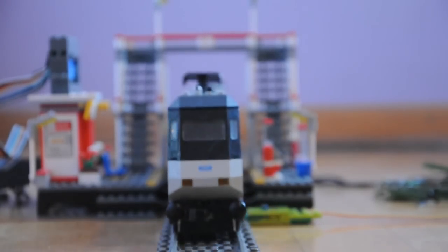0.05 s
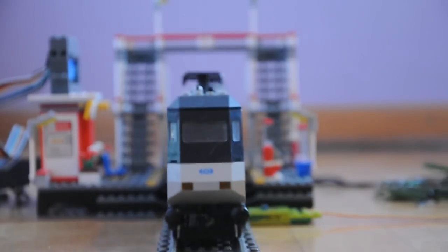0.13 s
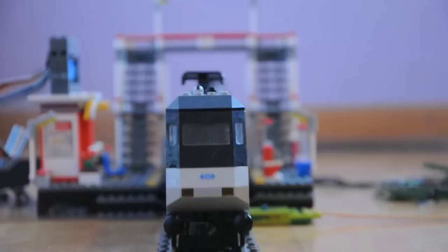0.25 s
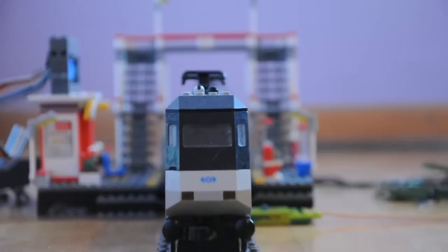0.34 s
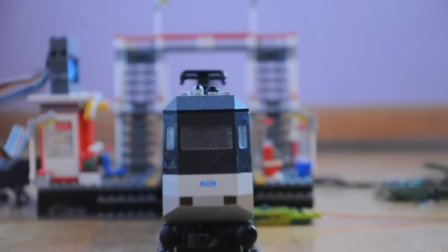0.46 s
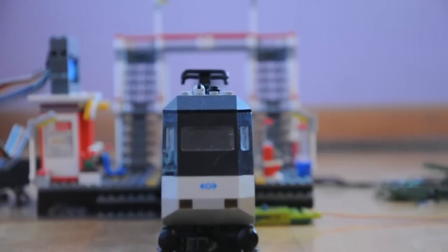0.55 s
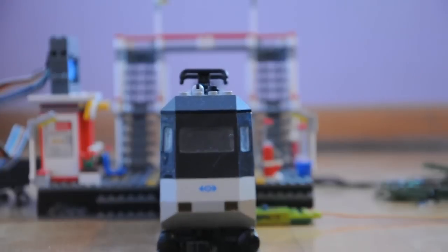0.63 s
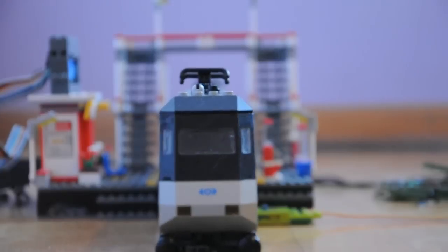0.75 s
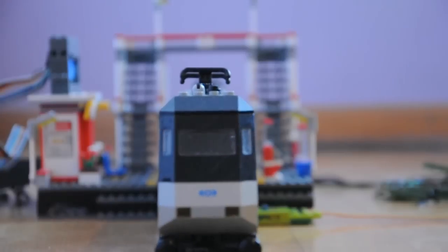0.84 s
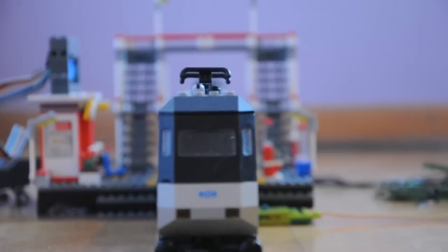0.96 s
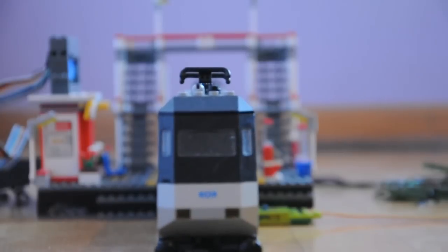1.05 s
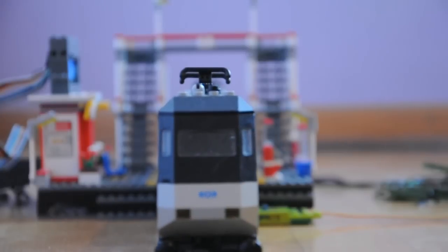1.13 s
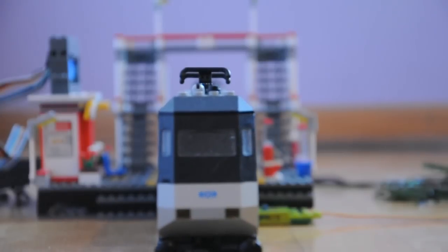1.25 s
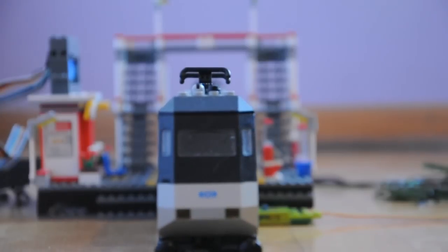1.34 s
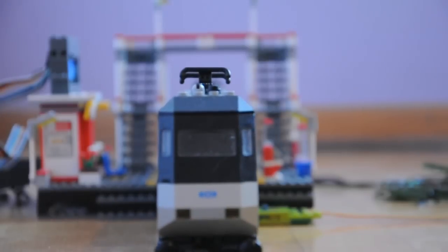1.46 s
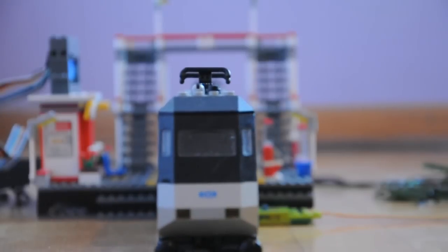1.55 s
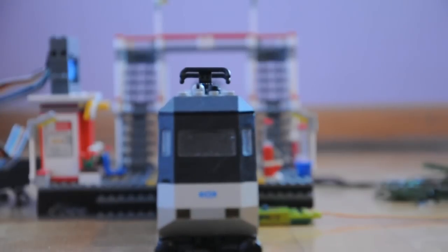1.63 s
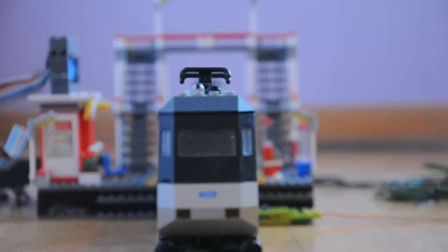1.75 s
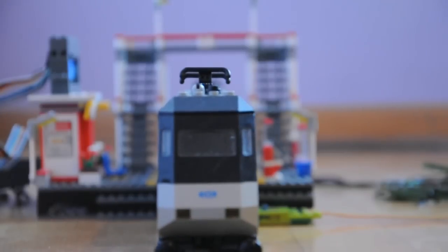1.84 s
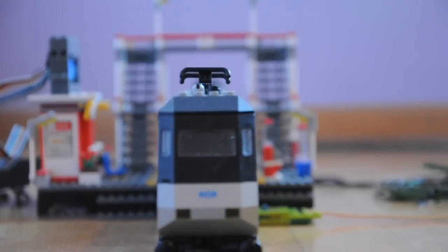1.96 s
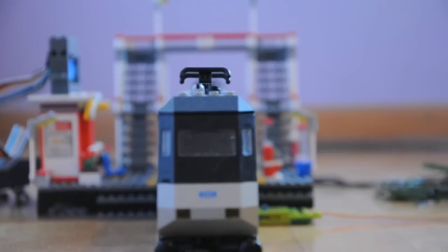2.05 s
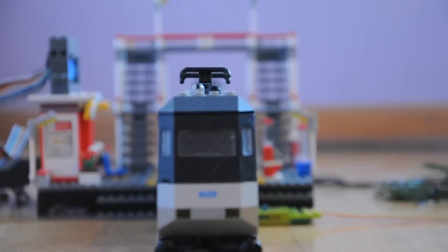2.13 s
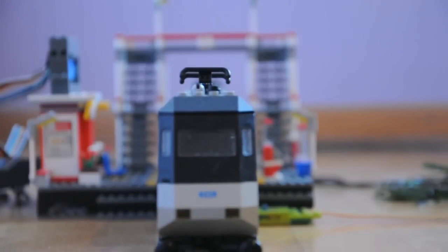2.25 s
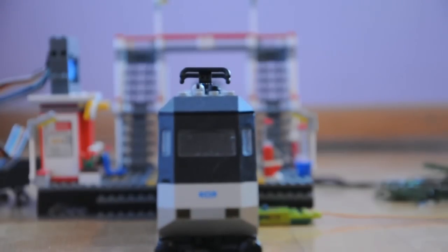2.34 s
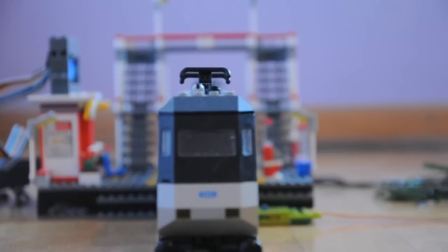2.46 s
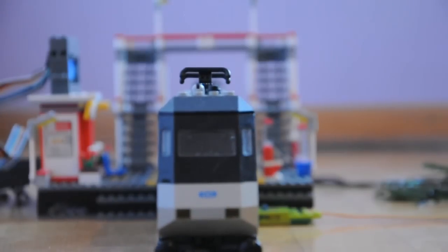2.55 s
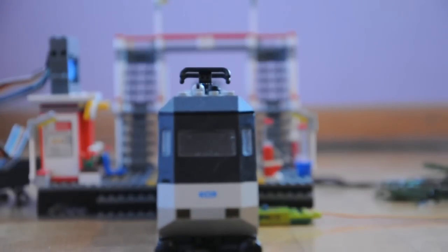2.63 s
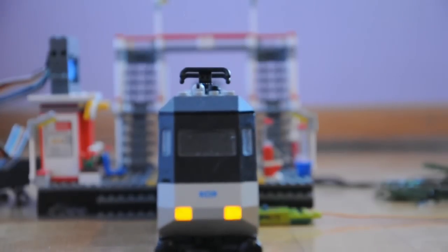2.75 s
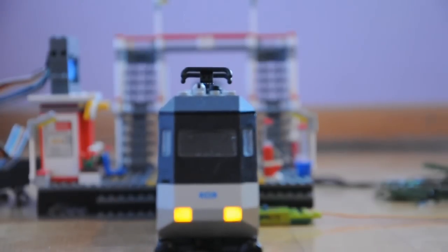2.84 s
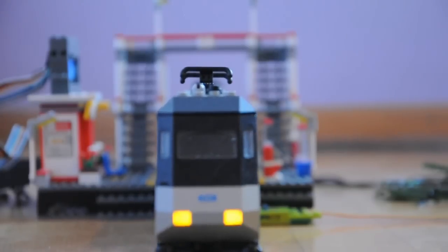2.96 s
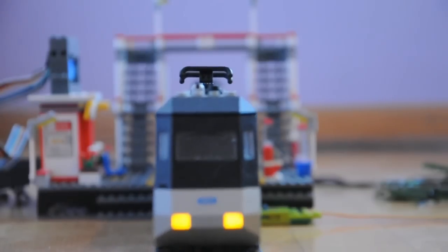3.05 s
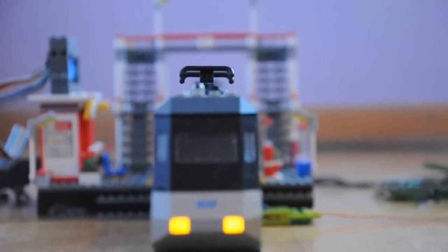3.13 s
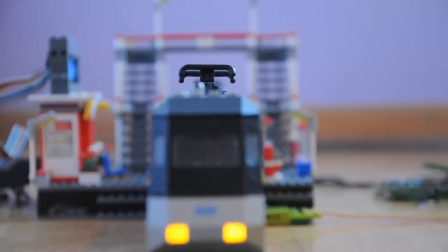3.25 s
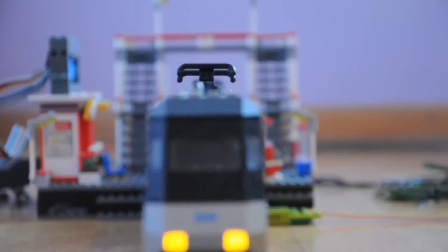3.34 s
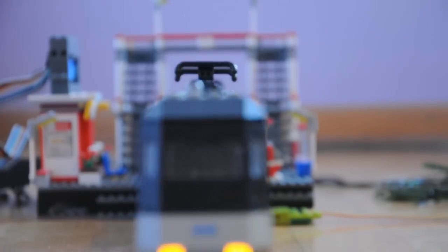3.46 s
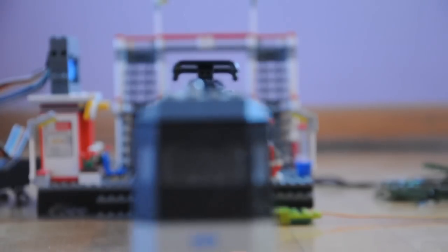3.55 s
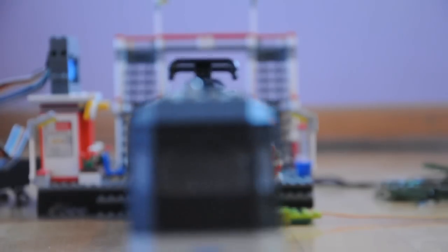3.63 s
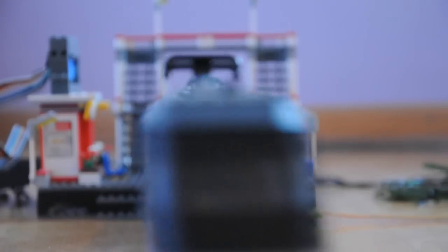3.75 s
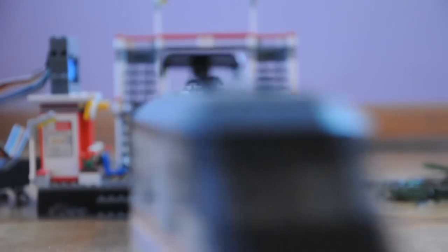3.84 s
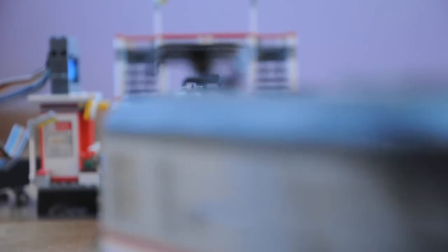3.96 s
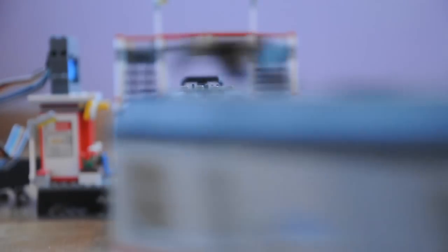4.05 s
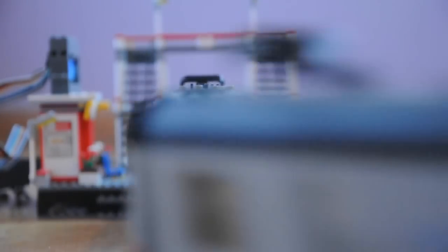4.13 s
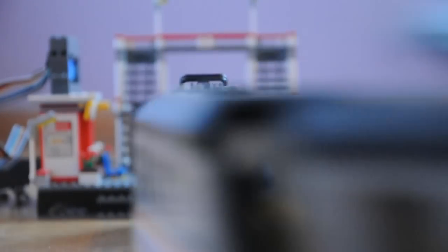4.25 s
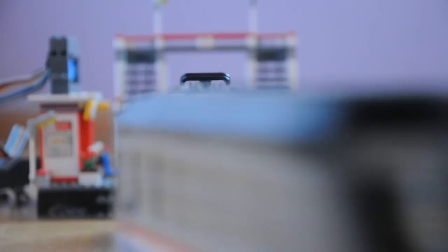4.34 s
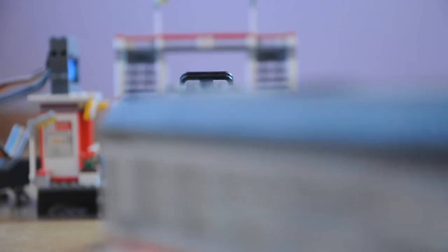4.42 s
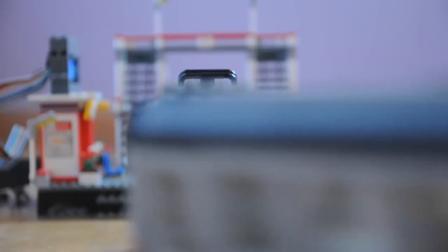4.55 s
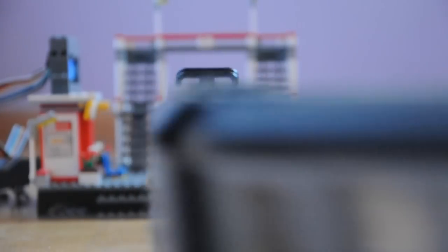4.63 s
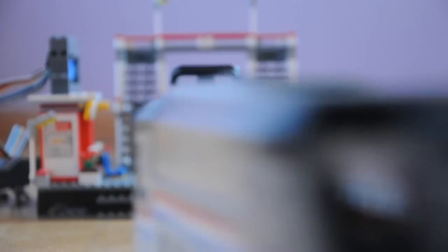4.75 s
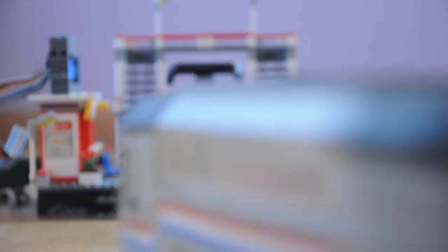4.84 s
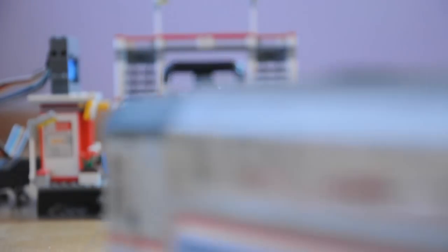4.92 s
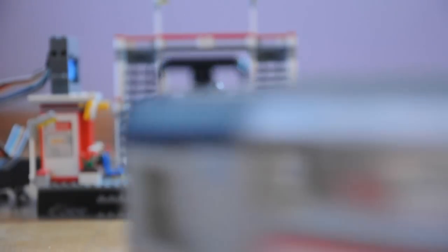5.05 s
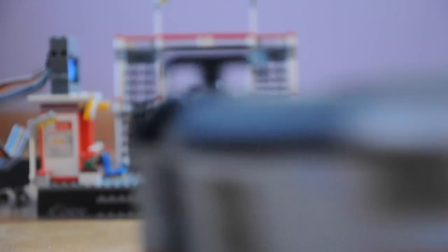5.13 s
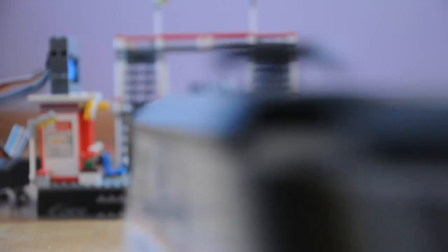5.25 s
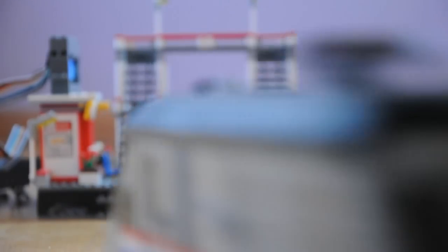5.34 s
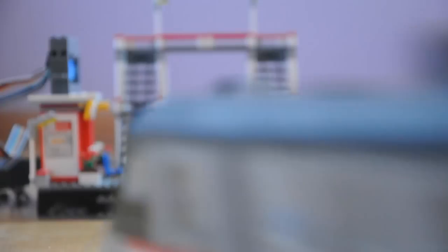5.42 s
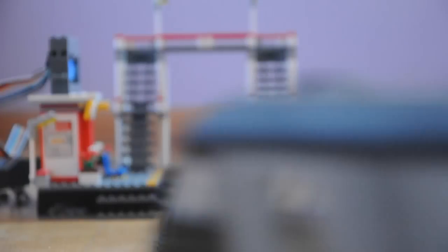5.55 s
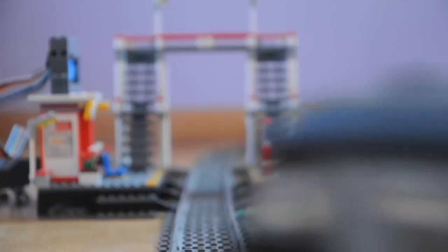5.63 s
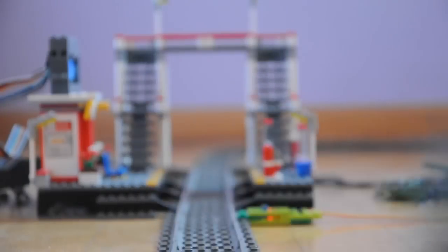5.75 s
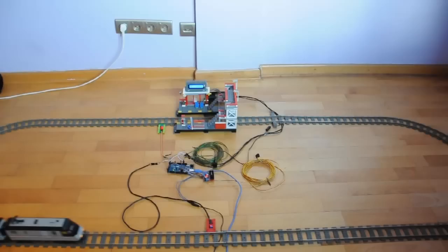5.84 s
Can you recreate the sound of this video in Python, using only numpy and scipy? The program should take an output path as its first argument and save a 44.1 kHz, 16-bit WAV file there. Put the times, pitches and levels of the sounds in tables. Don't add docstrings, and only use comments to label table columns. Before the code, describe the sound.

A toy electric train rattles to a stop, waits in a quiet humming room, then jerks into motion and whirs loudly past on plastic track.

```python
import sys
import numpy as np
from scipy import signal
from scipy.fft import rfft, irfft
from scipy.io import wavfile
from scipy.ndimage import uniform_filter1d

SR = 44100
rng = np.random.default_rng(int(sys.argv[2]) if len(sys.argv) > 2 else 0)


def linear_from_db(decibels):
    return 10 ** (np.asarray(decibels, float) / 20)


def digitize_waveform(pressure):
    field = np.atleast_2d(pressure).T
    bounded = np.clip(field, -1, 1)
    quanta = np.round(bounded * 32767).astype(np.int16)
    wavfile.write(sys.argv[1], SR, quanta)


N = 259749
TIME = np.arange(N) / SR
START_S = 1.5
MOTOR_PASSES_S = 3.84

# frequency in Hz, density in dB per Hz.
ROOM_SPECTRUM = [(15, -50), (25, -20), (69, -12.5), (101, -12), (174, -9), (256, -10), (328, -11),
                 (550, -17), (630, -17), (674, -17), (1060, -21), (2730, -24.5), (5500, -27), (7150, -88),
                 (12100, -120)]
# frequency in Hz, resting level in dB.
HUM_HZ = [73.4, 102.3, 155.3]
HUM_REST_DB = [-80.5, -71, -74.5]
# centre in seconds, half length in seconds, level in dB.
HUM_SWELLS = [
    [(.38, .08, -69), (2.8, 0.14, -70.5), (3.27, .2, -59), (4.13, 0.17, -60), (4.5, 0.19, -56.5),
     (5.0, 0.13, -69), (5.6, 0.1, -67)],
    [(.46, 0.061, -59), (1.68, 0.033, -62), (4.6, 0.26, -74), (5.45, 0.1, -70), (5.67, 0.039, -63),
     (5.89, 0.077, -62)],
    [(.13, .1, -76), (.46, .07, -58), (1.8, 0.14, -79), (5.8, 0.18, -52.5)],
]
# time in seconds, tooth mesh in Hz.
SPEED = [(0, 290), (.26, 248), (.32, 200), (.7, 40), (2.55, 40), (2.74, 138), (2.96, 222), (3.17, 306),
         (3.42, 388), (3.62, 438), (3.9, 474), (4.1, 498), (4.37, 504), (4.73, 480), (4.95, 474),
         (5.17, 452), (5.33, 412), (5.89, 404)]
# time in seconds, level in dB.
RATTLE = [(0, -37), (.1, -39.5), (.28, -44), (.535, -50.5), (.6, -59), (.73, -64.5), (.8, -73), (1.0, -99),
          (2.503, -95.5), (2.52, -48), (2.7, -47.5), (2.92, -44.5), (3.2, -37), (3.5, -28.5), (4.0, -27.5),
          (4.4, -29.5), (4.9, -30.5), (5.89, -34.5)]
# frequency in Hz, density in dB per Hz.
COASTING_SPECTRUM = [(71, -37), (120, -4), (219, -7), (260, -4), (399, -3.5), (521, -1), (780, -2),
                     (1900, -6), (2470, -8), (4180, -120)]
# frequency in Hz, density in dB per Hz.
TRACK_SPECTRUM = [(88, -37.5), (150, -13.5), (184, -11), (412, -4), (572, -3), (1080, 3), (1550, -2),
                  (1900, 0.5), (2470, -24), (4180, -120)]
SHELL_SPECTRUM = [(820, -30), (1400, -10.5), (1720, -13), (2240, -2.5), (2870, -8.5), (3110, -13.5),
                  (3600, -10), (4680, -8.5), (7920, -120)]
GEARS_SPECTRUM = [(1880, -18), (3200, -1.5), (3630, -11.5), (4350, 2.5), (5500, 4), (7150, -47.5),
                  (12100, -120)]
# time in seconds, shell mode in Hz, gearbox mode in Hz.
PANEL_MODES = [(0, 2350, 4560), (.8, 2350, 4730), (2.6, 2430, 4830), (3.2, 2230, 4640), (4.0, 1950, 4150),
               (4.55, 2080, 4680), (4.8, 2100, 5200), (5.89, 2250, 5070)]
# level in dB at a rattle of -40 dB, slope in dB per dB.
COAST_LAW = [(-44, 0.76), (-42.5, 0.97), (-41, 1)]
DRIVE_LAW = [(-41.5, .55), (-39.5, 1.11), (-41, 1.295)]
# centre in seconds, half length in seconds, extra level in dB.
LURCHES = [(2.951, 0.018, 4), (3.015, 0.024, 3), (3.087, 0.0085, 3.5), (3.15, 0.016, 2.5),
           (3.313, 0.021, -1), (4.504, 0.023, 1.5), (4.808, 0.035, 0), (5.8, .08, 1.5)]
# centre in seconds, half length in seconds, level in dB.
GEAR_LOADS = [(.19, .07, -56), (2.83, .05, -60), (3.05, .1, -52), (3.28, .07, -46), (3.52, .07, -49),
              (3.87, .11, -40), (4.06, .07, -41), (4.33, .13, -38), (4.865, .115, -39), (5.1, .09, -48),
              (5.5, .15, -55)]
# start in seconds, peak in dB, ring in Hz, t60 in seconds.
KNOCKS = [(.478, -46, 2300, .04), (.539, -41, 2400, .045), (2.952, -33, 2360, .04), (3.092, -30, 2270, .04),
          (3.18, -27, 1090, .07), (3.491, -18, 2400, .03), (3.934, -18, 2580, .045),
          (4.036, -22, 2950, .07), (4.075, -17, 2050, .032), (4.403, -20, 1960, .04),
          (5.403, -29, 2430, .04)]
# start in seconds, peak in dB, ring in Hz, t60 in seconds.
CREAKS = [(.6885, -31, 2400, .009), (.689, -48, 3700, .012), (.692, -49, 1350, .03), (.846, -54, 1520, .05),
          (.853, -55, 2100, .04), (.861, -55, 1600, .05)]
# start in seconds, peak in dB, ring in Hz, t60 in seconds.
SNATCH = [(2.512, -39, 1470, .05), (2.523, -35, 1470, .06), (2.560, -30, 1200, .05),
          (2.564, -25, 1000, .06), (2.569, -27, 1450, .05), (2.585, -33, 2000, .05),
          (2.589, -25, 1560, .07), (2.595, -26, 1400, .06), (2.601, -29, 750, .06), (2.607, -28, 1000, .06),
          (2.618, -28, 680, .09), (2.634, -30, 1050, .08), (2.638, -34, 2200, .04)]
# start in seconds, peak in dB, ring in Hz, t60 in seconds.
TICKS = [(2.518, -31, 4240, .03), (2.539, -38, 4900, .02), (2.551, -29, 4760, .018),
         (2.564, -28, 4590, .022), (2.8135, -40, 4650, .02), (3.080, -28, 4700, .05)]


def level(x, db=0):
    return x * linear_from_db(db) / np.sqrt(np.mean(x ** 2))


def colour(x, points):
    hz, db = np.transpose(points)
    bins_hz = np.maximum(np.arange(2049) * SR / 4096, 1)
    gain_db = np.interp(np.log(bins_hz), np.log(hz), db)
    octaves_below = np.log2(np.maximum(hz[0] / bins_hz, 1))
    octaves_above = np.log2(np.maximum(bins_hz / hz[-1], 1))
    gain_db -= 40 * (octaves_below + 2 * octaves_above)
    cepstrum = irfft(np.log(linear_from_db(gain_db)))
    cepstrum[1:2048] *= 2
    impulse = irfft(np.exp(rfft(cepstrum[:2049], 4096)))
    return signal.oaconvolve(x, impulse)[:N]


def walk(rate_hz):
    hold = int(SR / rate_hz)
    steps = np.repeat(rng.standard_normal(N // 40), hold)[:N]
    return level(uniform_filter1d(uniform_filter1d(steps, hold), hold))


def curve(table):
    s, *columns = np.transpose(table)
    return [np.interp(TIME, s, c) for c in columns]


def bump(s, half_s):
    return np.exp(-((TIME - s) / max(half_s, .005)) ** 4)


def swells(table, rest_db):
    return linear_from_db(rest_db) + sum(linear_from_db(db) * bump(s, half_s) for s, half_s, db in table)


def resonate(x, hz, width_hz):
    carrier = np.exp(2j * np.pi * np.cumsum(hz) / SR)
    pole = np.exp(-np.pi * width_hz / SR)
    return (carrier * signal.lfilter([1], [1, -pole], x / carrier)).real


def room():
    air = level(colour(rng.standard_normal(N), ROOM_SPECTRUM) * linear_from_db(.5 * walk(9)), -61.5)
    hums = 0
    for hz, rows, rest_db in zip(HUM_HZ, HUM_SWELLS, HUM_REST_DB):
        cycles = np.cumsum(hz * (1 + 0.0143 * walk(14.0))) / SR
        hums = hums + np.sin(2 * np.pi * cycles) * swells(rows, rest_db)
    return air + 1.2 * hums


def grains(per_s, scatter_db):
    when, size, sign = rng.random((3, N))
    height = linear_from_db(-scatter_db * np.log(1 - .985 * size))
    return level((when < per_s / SR) * height * np.sign(sign - .5))


def gear_motion():
    teeth_per_turn = 18.0
    mesh_hz, = curve(SPEED)
    phase = np.cumsum(mesh_hz * (1 + .005 * walk(30))) / SR
    turn = np.cos(2 * np.pi * (phase / teeth_per_turn + .1 * walk(4)) + 2.0)
    return mesh_hz, phase, turn


def part_gains():
    rattle, = curve(RATTLE)
    over_db = rattle + sum(db * bump(s, half_s) for s, half_s, db in LURCHES) + 40
    track_db, shell_db, gears_db = [
        np.where(TIME < START_S, a + b * over_db, c + d * over_db)
        for (a, b), (c, d) in zip(COAST_LAW, DRIVE_LAW)]
    past_s = np.maximum(TIME - MOTOR_PASSES_S, 0)
    track_db = track_db + 6.5 * bump(2.6, 0.028) + 0.53 * past_s
    shell_db = shell_db + 3 * bump(MOTOR_PASSES_S, 0.28)
    gears_db = gears_db + 1.5 * past_s + 3 * bump(2.635, 0.027)
    return [linear_from_db(db) * (over_db > -54) for db in (track_db, shell_db, gears_db)]


def wheels_on_track(chatter):
    grit = 0.59 * chatter + grains(5000, 2.4)
    coasting = level(colour(grit, COASTING_SPECTRUM))
    driven = level(colour(grit, TRACK_SPECTRUM))
    drone = sum(level(resonate(grit, hz + 0 * TIME, 45), db) for hz, db in ((515, -14), (700, -13)))
    return np.where(TIME < START_S, coasting, driven) + bump(4.99, .5) * drone


def plastic_shell(chatter, mode_hz, mode_db):
    grit = 0.66 * chatter + grains(5000, 3.33)
    mode = resonate(np.roll(grit, 700), mode_hz * (1 + .025 * walk(20)), 460.)
    return level(colour(grit, SHELL_SPECTRUM)) + linear_from_db(mode_db) * level(mode)


def gearbox(chatter, mode_hz, mode_db):
    grit = 0.16 * chatter + grains(5000, 4.5)
    mode = resonate(np.roll(grit, 500), mode_hz * (1 + .02 * walk(25)), 560.)
    return level(colour(grit, GEARS_SPECTRUM)) + linear_from_db(mode_db) * level(mode)


def train_rattle(phase, turn):
    shell_hz, box_hz = curve(PANEL_MODES)
    facing = (1 - np.tanh((TIME - 3.36) / 0.094)) / 2
    shell_mode_db = -8.5 + (1.5 + 8.5) * facing
    box_mode_db = -12.5 + (10.5 + 12.5) * facing
    tooth = np.exp(-(phase % 1) / 0.094)
    chatter = grains(2500, 0.96) * (0.88 + tooth)
    shake = walk(45)
    track = wheels_on_track(chatter) * linear_from_db(0.5 * shake + 0.14 * turn + 0.65 * walk(24.785))
    shell = plastic_shell(chatter, shell_hz, shell_mode_db) * linear_from_db(0.9 * shake + 0.6 * turn + 0.1 * walk(70))
    gears = gearbox(chatter, box_hz, box_mode_db) * linear_from_db(0.33 * shake + 0.29 * turn + 0.36 * walk(90))
    return sum(level(part) * gain for part, gain in zip((track, shell, gears), part_gains()))


def mesh_whine(mesh_hz, phase, turn):
    flutter = 1 + .55 * turn * np.clip(mesh_hz / 480, 0, 1) ** 2
    whine = np.sin(2 * np.pi * phase) * flutter * linear_from_db(2.2 * walk(40) + 1.2 * walk(14))
    near_mode = np.exp(-((mesh_hz - 172) / 20) ** 2)
    whine = whine + linear_from_db(16.0) * near_mode * np.sin(4 * np.pi * phase)
    return 1.3 * whine * swells(GEAR_LOADS, -63) * np.clip(mesh_hz / 300, 0, 1) ** 3


def knocks(table, spread, noisy):
    length = 4410
    out, t = np.zeros(N + length), np.arange(length) / SR
    for s, db, hz, t60 in table:
        detune = 1 + 0.09 * rng.standard_normal(3)
        ring = sum(np.sin(2 * np.pi * hz * (1 + spread * k * detune[k + 1]) * t) for k in (-1, 0, 1))
        scrape = signal.lfilter(*signal.iirpeak(hz, 2.5, fs=SR), rng.standard_normal(length))
        decay = linear_from_db(db - 60 * t / max(t60, .005))
        attack = np.minimum(t / .0012, 1)
        start = int(s * SR)
        out[start:start + length] += decay * (ring / 3 + noisy * scrape) * attack
    return out[:N]


def chopper():
    chop_hz, armature_per_tooth = 1470, .29
    turns_hz = armature_per_tooth * curve(SPEED)[0]
    side_db = np.interp(TIME, [2.512, 2.78, 3.38, 3.5], [-56, -52, -52, -72], left=-120, right=-120)
    carrier = 2 * np.pi * chop_hz * TIME
    spin = 2 * np.pi * np.cumsum(turns_hz * (1 + .015 * walk(20))) / SR
    sides = np.sin(carrier - spin) + linear_from_db(-7) * np.sin(carrier + spin)
    tones = sides + linear_from_db(-9) * np.sin(carrier) + linear_from_db(-10) * np.sin(carrier / 3)
    return 1.9 * tones * linear_from_db(side_db + 1.5 * walk(30))


def reflections(near):
    t60_s, gap_s = .3, .003
    t = np.arange(13230) / SR
    tail = rng.standard_normal(len(t)) * linear_from_db(-60 * t / t60_s) * (t > gap_s)
    return linear_from_db(-15.0) * signal.oaconvolve(near, tail / np.sqrt(np.sum(tail ** 2)))[:N]


def scene():
    mesh_hz, phase, turn = gear_motion()
    near = train_rattle(phase, turn)
    near = near + knocks([*KNOCKS, *SNATCH], 0.122, 2.55)
    near = near + knocks(CREAKS, 0.018, 1.0) + knocks(TICKS, 0.0415, 1.0)
    tones = mesh_whine(mesh_hz, phase, turn) + chopper()
    return (near + reflections(near) + tones + room())[None]


def roll_off(x):
    return signal.sosfilt(signal.butter(12, 15700, fs=SR, output="sos"), x)


def record(dry):
    lowpass = signal.ellip(6, .3, 60, 5450, fs=SR, output="sos")
    narrow = signal.sosfilt(lowpass, dry[0])
    grid = np.arange(N * 160 // 147 + 2) * 147 / 160
    bridged = np.interp(grid, np.arange(0, N, 4), narrow[::4])
    mix = signal.resample_poly(bridged, 147, 160)[None, :N]
    return roll_off(mix)


dry = scene()
out = record(dry)
digitize_waveform(out)
```